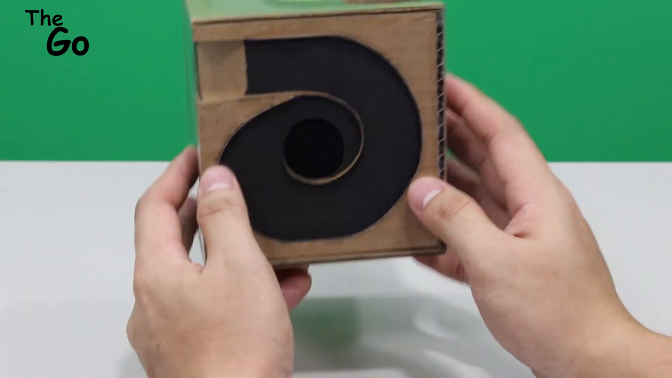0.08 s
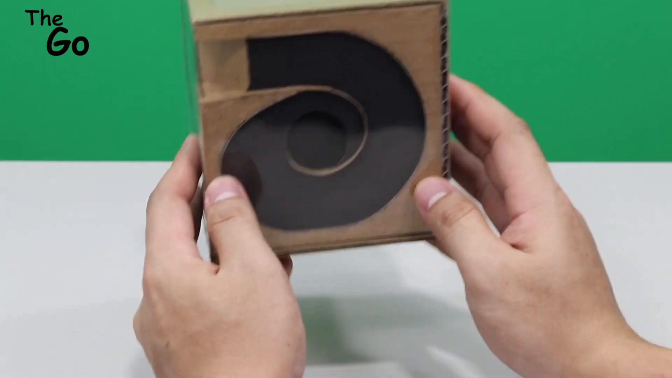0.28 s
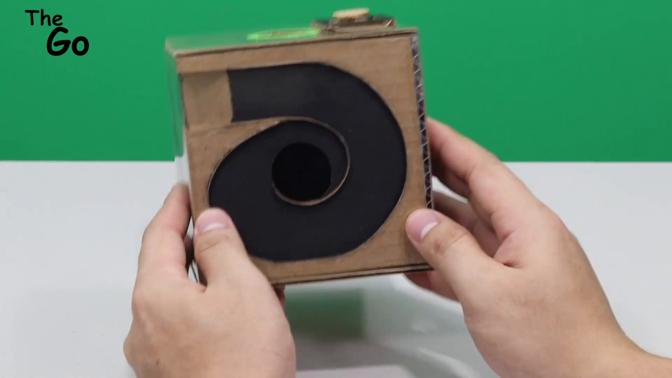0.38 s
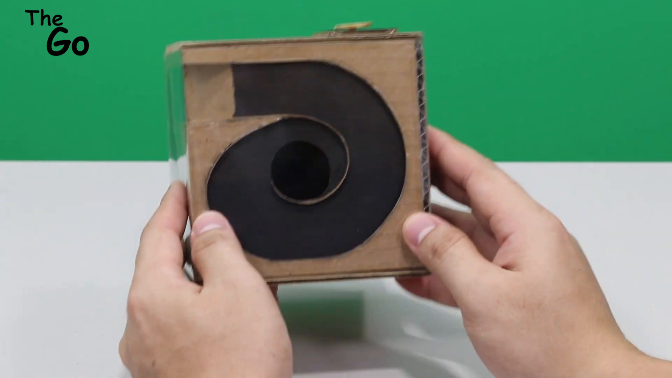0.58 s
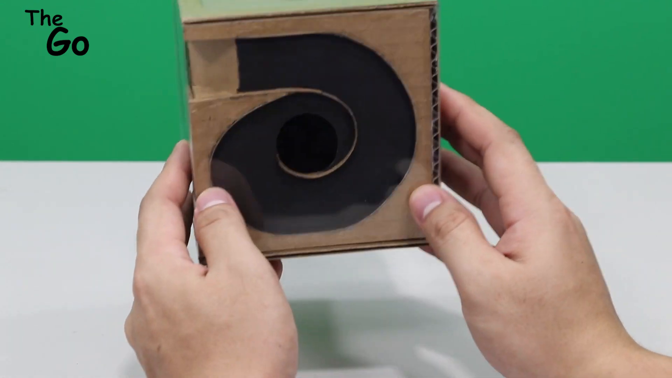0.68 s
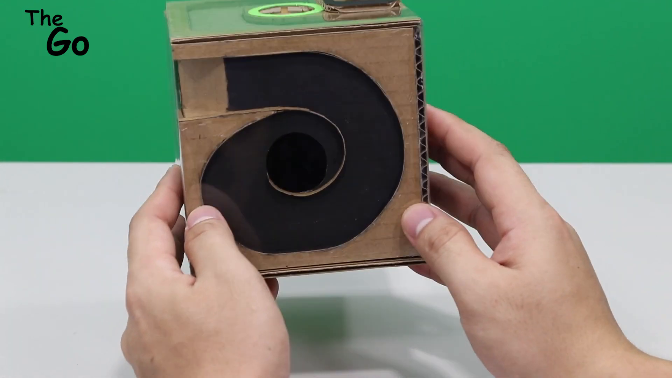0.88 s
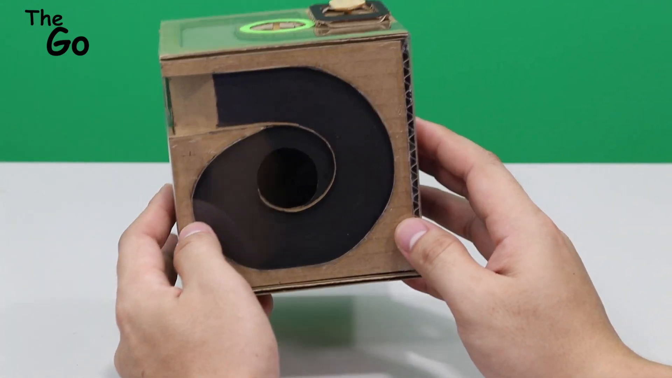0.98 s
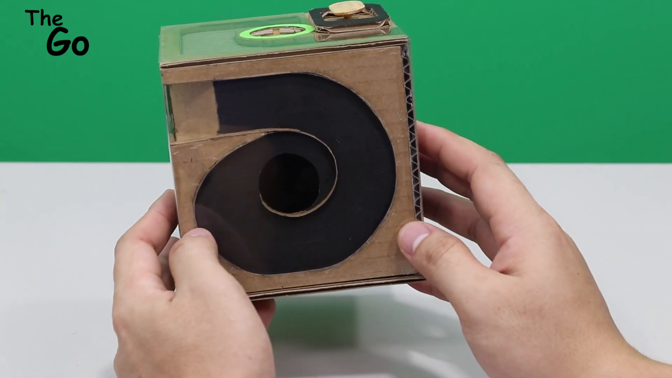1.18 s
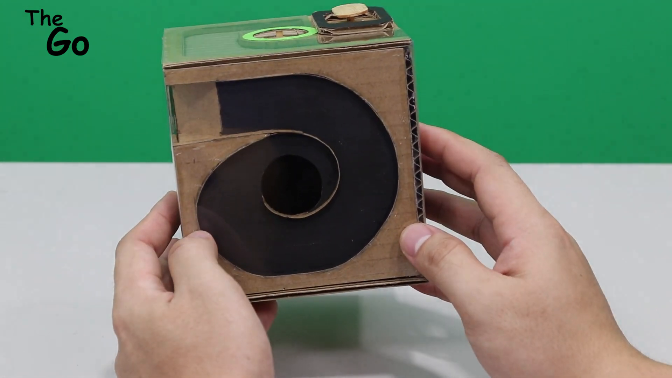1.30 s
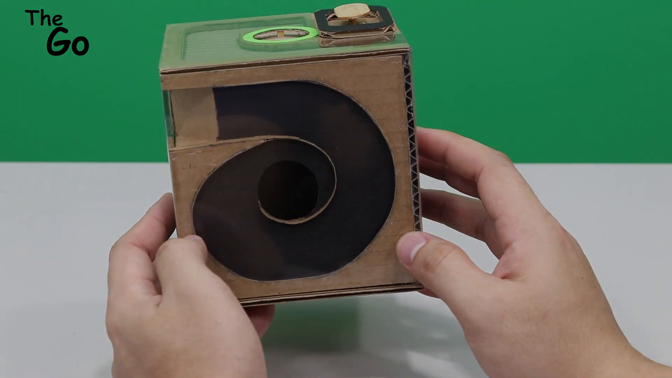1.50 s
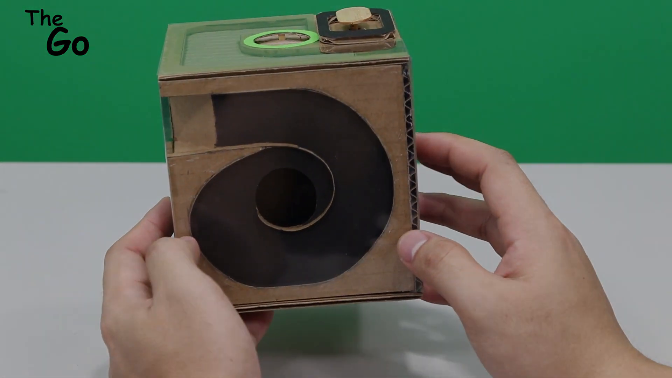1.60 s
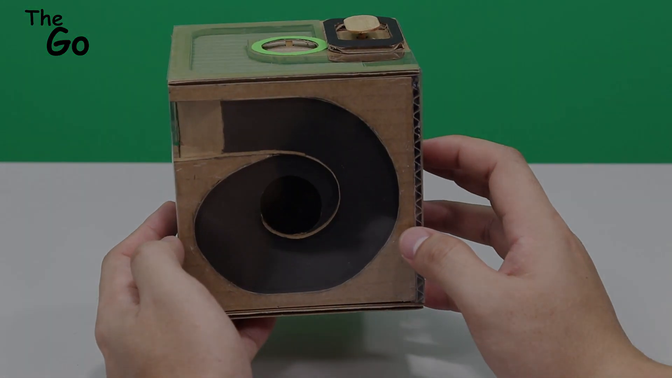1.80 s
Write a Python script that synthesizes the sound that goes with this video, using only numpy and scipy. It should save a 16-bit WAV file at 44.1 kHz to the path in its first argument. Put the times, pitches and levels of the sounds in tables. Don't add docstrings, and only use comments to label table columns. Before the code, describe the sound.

A coin rolls inside a hand-held cardboard box: a faint finger rustle, then a sharp clatter, grainy rolling with clusters of hollow knocks, a few soft wobbles, and quiet. Close microphone, small quiet room.

```python
import sys
import numpy as np
from scipy import signal
from scipy.fft import rfft, irfft
from scipy.io import wavfile

SR = 44100
rng = np.random.default_rng(int(sys.argv[2]) if len(sys.argv) > 2 else 0)


def decibels_to_gain(level_db):
    exponent = np.asarray(level_db, float) / 20
    return 10 ** exponent


def transcribe(signal):
    frames = np.atleast_2d(signal).T
    limited = np.clip(frames, -1, 1)
    pcm = np.round(limited * 32767).astype(np.int16)
    wavfile.write(sys.argv[1], SR, pcm)


N = 83790

# pitch in Hz, level in dB, time to fall 60 dB in s.
BOX = [(392.7, -23.5, 0.22), (426.4, -11, 0.11), (498.3, -13.5, 0.11), (583.2, -11.5, 0.13),
       (667.4, -9, 0.14), (758.8, -12, 0.15), (860, -18, 0.079), (939.4, -14, 0.15), (994, -26, 0.031),
       (1162, -5.5, 0.073), (1290, -2.5, 0.033), (1446, -8.5, 0.056), (1650, -2, 0.043),
       (2163, -0.5, 0.059)]
HOLLOW_HZ = 850


def rms_one(x):
    return x / np.sqrt(np.mean(x ** 2) + 1e-20)


def colour(x, points):
    hz, db = np.transpose(points)
    log_hz = np.log(np.arange(N // 2 + 1) * SR / N + 1)
    return irfft(rfft(x) * decibels_to_gain(np.interp(log_hz, np.log(hz), db)), N)


def noise(points):
    return rms_one(colour(rng.standard_normal((2, N)), points))


def split(x, hz, kind):
    return signal.sosfilt(signal.butter(4, hz, kind, fs=SR, output="sos"), x)


def drift(rate):
    r = np.exp(-2 * np.pi * rate / SR)
    warm_up = 9000
    wander = signal.lfilter([1], [1, -2 * r, r * r], rng.standard_normal(N + warm_up))
    return rms_one(wander[warm_up:])


def ring(x, hz, t60):
    r, w = decibels_to_gain(-60 / (t60 * SR)), 2 * np.pi * hz / SR
    return signal.lfilter([0, np.sin(w)], [1, -2 * r * np.cos(w), r * r], x + 1e-18)


def clicks(s, size):
    out = np.zeros(np.shape(size)[:-1] + (N,))
    out[..., (np.asarray(s) * SR).astype(int)] = size
    return out


def dying(x, t60):
    return signal.lfilter([1], [1, -decibels_to_gain(-60 / (t60 * SR))], x + 1e-18)


def room_air():
    # pitch in Hz, level in dB.
    air_colour = [(15, -22), (40, -8), (150, -2.5), (416, -1), (818, -10.5), (2050, -18), (3160, -24.5),
                  (9320, -24.5), (16000, -32)]
    return decibels_to_gain(-54.5) * noise(air_colour)


def room(x):
    t60, wall_cut_hz = 0.56, 9400
    out, dull = np.zeros((2, N)), np.exp(-2 * np.pi * wall_cut_hz / SR)
    z = np.exp(-2j * np.pi * np.arange(N + 1) / (2 * N))
    lags = (rng.uniform(.015, .045, 12) * SR).astype(int)
    for k, lag in enumerate(lags):
        fade = decibels_to_gain(-60 * lag / SR / t60)
        loop = fade * (1 - dull) / (1 - dull * z) * z ** lag
        echoes = irfft(rfft(x, 2 * N) * loop / (1 - loop))[:N]
        out[k % 2] += echoes * (-1) ** (k // 2)
    return out


def hands():
    # start in seconds, level in dB, length in seconds.
    thumps = [
        (.481, -45, .008),
        (.908, -34, .009),
    ]
    # start in seconds, level in dB, time to fall 60 dB in s.
    fingers = [
        (.001, -49.5, 0.38),
        (0.049, -42.5, 0.22),
        (.066, -54.5, 0.51),
        (0.128, -50, 1),
        (0.149, -77, 0.039),
    ]
    # pitch in Hz, level in dB per Hz.
    finger_colour = [(180, -31), (300, 3.5), (930, -4), (2570, -13.5), (3640, -19), (12500, -23.5),
                     (16000, -34)]
    t, out = np.arange(N) / SR, np.zeros((2, N))
    for s, db, length in thumps:
        progress = np.clip((t - s) / length, 0, 1)
        out = out + decibels_to_gain(db) * np.sin(np.pi * progress) ** 2
    rustle = noise(finger_colour)
    for s, db, t60 in fingers:
        out = out + dying(clicks([s], decibels_to_gain([db])), t60) * rustle
    return out


def settling():
    # start in seconds, length in seconds, level in dB, favoured wall pitch in Hz.
    bursts = [
        (1.321, 0.015, -17, 1080),
        (1.357, 0.013, -19, 970),
        (1.388, 0.04, -20.5, 934),
        (1.436, 0.049, -30.5, 875),
        (1.494, 0.087, -44.5, 815),
    ]
    favour_db_per_octave, ring_share = 18.5, .7
    t, out = np.arange(N) / SR, 0
    for hz, level_db, t60 in BOX:
        drive = 0
        for s, length, db, wall_hz in bursts:
            on = (t > s) & (t < s + length)
            drive = drive + on * decibels_to_gain(db - favour_db_per_octave * abs(np.log2(hz / wall_hz)))
        out = out + ring(drive * rng.standard_normal((2, N)), hz, ring_share * t60) * decibels_to_gain(level_db - 19)
    return split(out, [600, 3500], "band")


def singing():
    # start in seconds, low tone in dB, its twin in dB, twin pitch in Hz, high tones in dB.
    spells = [(.255, -51, -41, 8520, -52), (.40, -49, -55, 8900, -55), (0.489, -36.5, -41, 8850, -38.5),
              (0.569, -38, -30.5, 8475, -42), (.672, -43, -62, 9000, -54),
              (0.701, -45.5, -38.5, 8386, -41.5), (0.821, -44, -36, 8440, -44.5),
              (0.883, -46, -60, 8560, -66), (1.013, -40.5, -44.5, 8500, -42),
              (1.073, -49, -67, 8500, -59.5), (1.13, -52, -39.5, 8510, -66), (1.2, -56, -51, 8650, -79),
              (1.289, -70, -79, 8650, -99)]
    low_t60, high_t60 = 0.077, 0.043
    t = np.arange(N) / SR
    out = ring(clicks([1.17], decibels_to_gain([-45])), 8650, 1.0)
    rough = rng.standard_normal((4, 2, N))
    for (start, low_db, twin_db, twin_hz, high_db), after in zip(spells, spells[1:]):
        on = (t >= start) & (t < after[0])
        modes = [(8330, low_db, low_t60), (twin_hz, twin_db, low_t60)]
        modes += [(hz, high_db - 0.5, high_t60) for hz in (14430, 14570)]
        for drive, (hz, db, t60) in zip(rough, modes):
            even = np.sqrt(4 * np.log(1000) / (t60 * SR))
            out = out + decibels_to_gain(db) * even * ring(on * drive, hz, t60)
    return decibels_to_gain(0.5) * out


def rolling():
    # time in seconds, pressure on card in dB, rim scrape in dB, hollowness of track in dB.
    roll = [(0.228, -47, -61, 3), (0.237, -12.5, -44, -7), (.29, -17.5, -38, -8), (0.398, -19.5, -39, -2.5),
            (0.476, -26, -52, -6.5), (0.489, -23, -41.5, 6), (0.601, -18, -35, -4.5), (.67, -30, -47, 6.5),
            (.73, -22, -40, -5), (.87, -18.5, -39.5, -4), (.93, -20.5, -41, -4.5), (1.03, -20, -39, -4.5),
            (1.18, -17.5, -37, -5), (1.312, -33, -54, -4.5), (1.352, -34, -53.5, -6),
            (1.419, -27.5, -54.5, -31), (1.52, -41.5, -73, -13), (1.66, -55, -97, -13)]
    # time in seconds, favoured pitch in Hz, level of big panels in dB.
    place = [(.25, 900, 0.5), (.33, 750, -13), (.44, 735, -2), (.5, 626, 0), (.62, 730, -4.5),
             (.7, 600, 10), (.8, 610, 0), (.9, 573, 4.5), (1.0, 700, 0.5), (1.1, 930, -6.5), (1.2, 816, -2),
             (1.3, 780, -0.5)]
    # pitch in Hz, level in dB per Hz.
    rumble_colour = [(59, -50), (150, 11), (330, -9), (768, -3), (1060, -4), (4980, -19.5), (13200, -79),
                     (14700, -40), (16000, -56)]
    bumps_per_s, bump_spread, place_db_per_octave, panel_hz = 500, 4.1, 7, 520
    t = np.arange(N) / SR
    s, *columns = np.transpose(roll)
    press, rim, hollow = [(t > s[0]) * decibels_to_gain(np.interp(t, s, column)) for column in columns]
    at, wall_hz, panel_db = np.transpose(place)
    wall_hz, panel_db = np.interp(t, at, wall_hz), np.interp(t, at, panel_db)

    body = 0
    for hz, db, t60 in [*BOX, (237.7, -15, 0.089)]:
        hits = rng.random((2, N)) < bumps_per_s / SR
        strength = decibels_to_gain(bump_spread * np.minimum(rng.exponential(1, (2, N)), 2.5))
        bumps = hits * strength * rng.choice([-1, 1], (2, N))
        far_db = place_db_per_octave * abs(np.log2(hz / wall_hz))
        level_db = db + 2.54 * drift(5.7) + panel_db * (hz < panel_hz) - far_db
        body = body + decibels_to_gain(level_db) * ring(bumps, hz, t60) * 500 / hz

    card = decibels_to_gain(-3) * rms_one(body) + decibels_to_gain(-11) * split(noise(rumble_colour), 2890, "low")
    card = hollow * split(card, HOLLOW_HZ, "low") + split(card, HOLLOW_HZ, "high")
    ticks = (rng.random(N) < 400 / SR) * decibels_to_gain(3 * np.minimum(rng.exponential(1, N), 2))
    grit = sum(ring(ticks * rng.standard_normal((2, N)), hz, .008) for hz in (1300, 1900, 2600))
    card = card + decibels_to_gain(-17) * rms_one(grit)
    scrape = noise([(2000, -53), (3500, 8.0), (5000, -4.5), (6500, 1.5), (9000, 6.0), (12000, -10.0),
                    (16000, -21)])
    flutter = decibels_to_gain(0.5 * drift(30) + 1.11 * drift(160))
    return flutter * (press * card + rim * scrape)


def knocks():
    # time in seconds, peak in dB, bright crack in dB, hollow part in dB, pitch of wall struck in Hz.
    blows = [(.2292, -5, -24, -3.5, 710), (.2422, 1.5, -21, -34, 1515), (.2458, -11, -34, -4, 1290),
             (.2490, -6.5, -18, -24, 1650), (.2550, -3.5, -19.5, -20, 1180), (.2648, -19, -27, -11.5, 1000),
             (.2695, -18.5, -22, -21, 810), (.2902, -12, -26, -6, 680), (.4803, 1.5, -20.5, -14.5, 880),
             (.4905, -0.5, -25, -28, 550), (.5050, -3.5, -16.5, -3.5, 686), (.5112, -7, -17.5, 1, 930),
             (.5526, -21, -8, -15, 650), (.6040, -20.5, -30, 11, 685), (.6685, -4, -10, -2, 1210),
             (.6775, 0.5, -45, -3.5, 1110), (.6795, -2, -40, -23, 1250), (.6855, -4.5, -33, -19, 1250),
             (.7045, -2, -18.5, -2.5, 1020), (.7101, -9, -16.5, -10, 910), (.8497, -18, -32, 6, 650),
             (.8733, -3, -21.5, -1, 1060), (.8783, -14, -49, 1, 764), (.8830, -9, -33, -8, 1280),
             (.8918, -12.5, -42, 9, 910), (.9080, 0, -20.5, -11, 1290), (.9183, -7, -23, -1, 630),
             (.9322, -7, -16.5, -9, 1510), (1.0578, -8.5, -26, -22, 915), (1.0702, -2, -19, -6, 1260),
             (1.0775, -8, -23, 3.5, 1150), (1.0862, -8.5, -38, 0, 735), (1.0980, -3, -19.5, -17, 1150),
             (1.1150, -8, -20, -22, 1240), (1.1310, -17, -30, 2, 804), (1.1482, -5.5, -20.5, -16, 1300),
             (1.1570, -16, -26, -19, 1220), (1.1805, -13, -23, -7, 1200), (1.3228, -23, -26, -16, 1170),
             (1.3955, -16, -28, -34, 1030)]
    # pitch in Hz, level in dB per Hz.
    fibre_colour = [(88, -48), (150, -39), (624, -2), (2180, -10), (5250, -29.5), (8560, -20.5),
                    (11900, -34), (14500, -30), (16000, -48)]
    struck_db_per_octave, spread_db = 13.5, 6.5
    s, db, bright_db, hollow_db, wall_hz = np.transpose(blows)
    hollow_db = hollow_db + 5

    out = np.zeros((2, N))
    for at, peak_db, hz in zip(s, db, wall_hz):
        out = out - ring(clicks([at], decibels_to_gain([peak_db - 2])), hz, 9 / hz) * [[1], [.4]]
    for hz in (2220, 3620):
        out = out - ring(clicks(s, decibels_to_gain(db - 21.5) * [[1], [-.6]]), hz, 0.0095)

    for k, (hz, level_db, t60) in enumerate(BOX):
        chance = rng.standard_normal((3, len(s)))
        far_db = struck_db_per_octave * abs(np.log2(hz / wall_hz))
        size_db = db - 11 + level_db + hollow_db * (hz < HOLLOW_HZ) - far_db
        size = decibels_to_gain(size_db + spread_db * np.clip(chance[:2], -2, 1))
        side_sign = np.sign(chance[2])
        out = out - (-1) ** k * ring(clicks(s, size * [np.ones(len(s)), side_sign]), hz, t60)

    crack_noise = split(rng.standard_normal((2, N)), [5800, 11000], "band")
    crack = dying(clicks(s, decibels_to_gain(db + bright_db + 3)), 0.011) * crack_noise

    fibres = noise(fibre_colour)
    low, high = split(fibres, HOLLOW_HZ, "low"), split(fibres, 3700, "high")
    middle = split(split(fibres, HOLLOW_HZ, "high"), 4300, "low")
    crunch = 0
    for band, more_db in [(low, hollow_db), (middle, 0), (high, bright_db + 17)]:
        crunch = crunch + dying(clicks(s, decibels_to_gain(db - 11.5 + more_db)), 0.041) * band
    return split(out, 5500, "low") + crack + crunch


def scene():
    # pitch in Hz, level of the side in dB.
    width = [(30, -9), (150, -17), (400, -12), (1000, -8), (2500, -4), (6000, -2.5), (14000, -1)]
    # pitch in Hz, left over right in dB.
    lean = [(60, -1.5), (200, 0), (600, 1.5), (1500, -1.5), (3000, 0), (12000, -1)]
    box = split(knocks() + rolling() + settling() + singing(), 247.5, "high")
    mid, side = box + hands() + decibels_to_gain(-20.5) * room(box[0]) + room_air()
    side = colour(side, width)
    left = colour(mid + side, np.array(lean) * [1, .5])
    right = colour(mid - side, np.array(lean) * [1, -.5])
    return np.array([left, right])


def low_pass(x):
    return signal.sosfilt(signal.butter(12, 15800, fs=SR, output="sos"), x)


def record(dry):
    mix = np.clip(dry, -1, 1)
    return low_pass(mix)


dry = scene()
out = record(dry)
transcribe(out)
```